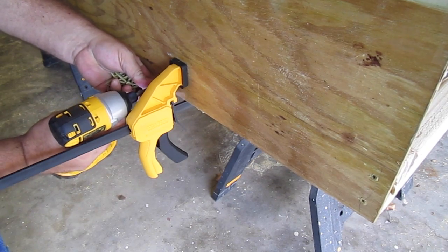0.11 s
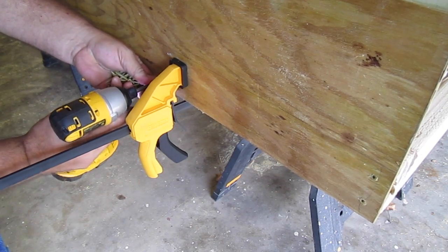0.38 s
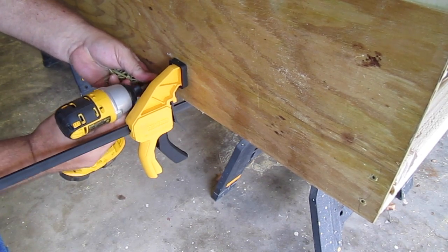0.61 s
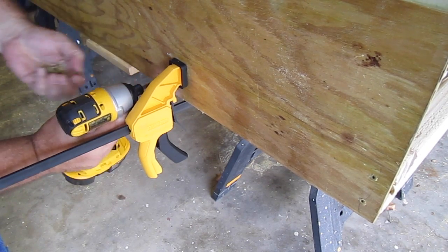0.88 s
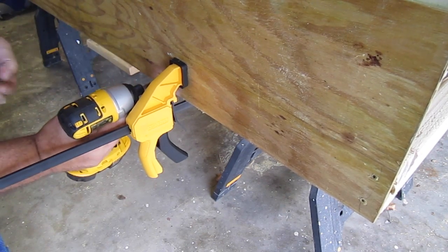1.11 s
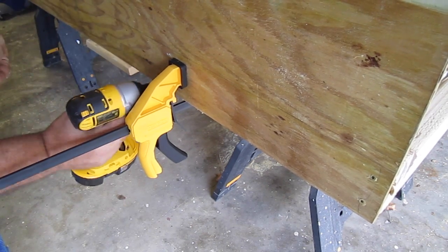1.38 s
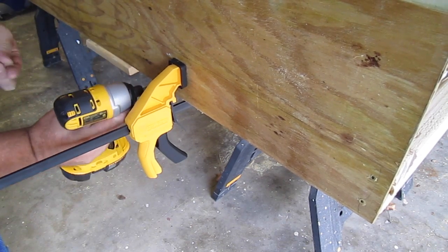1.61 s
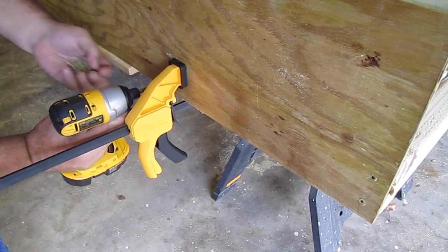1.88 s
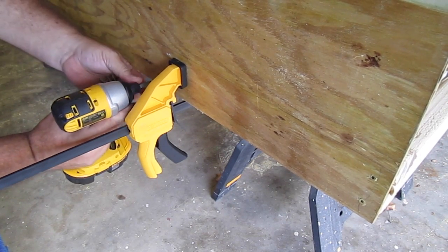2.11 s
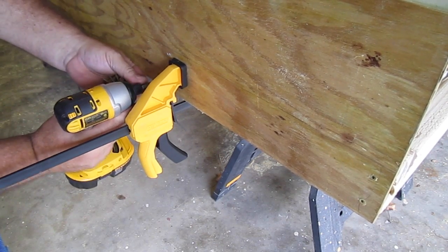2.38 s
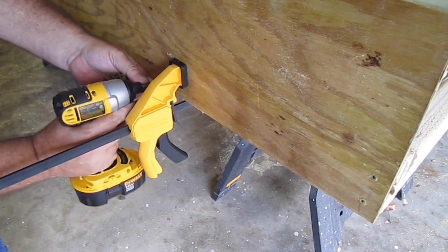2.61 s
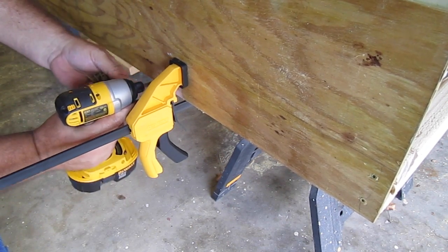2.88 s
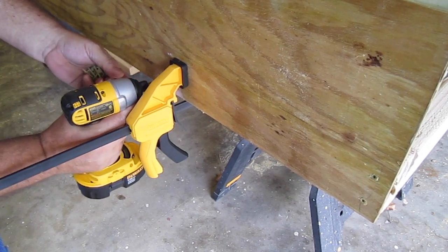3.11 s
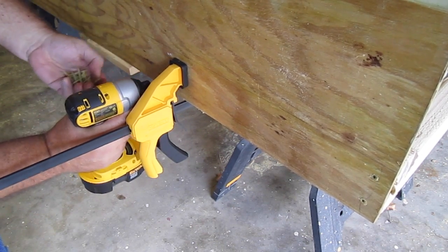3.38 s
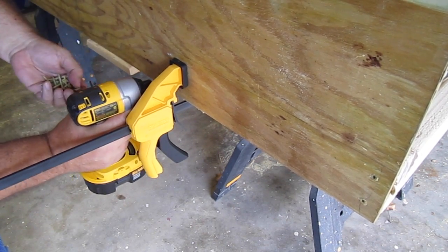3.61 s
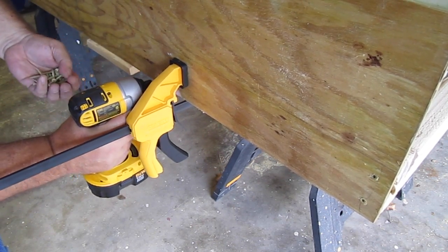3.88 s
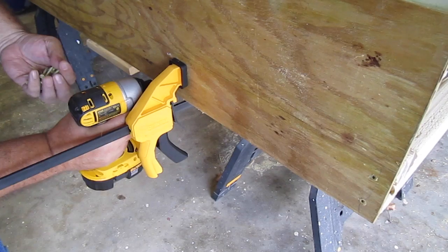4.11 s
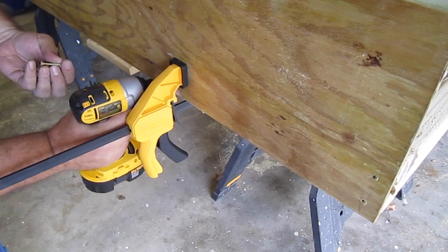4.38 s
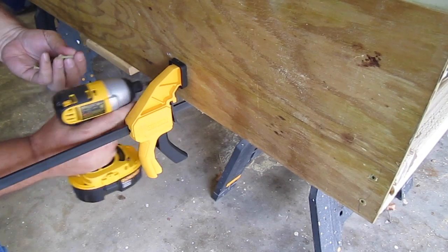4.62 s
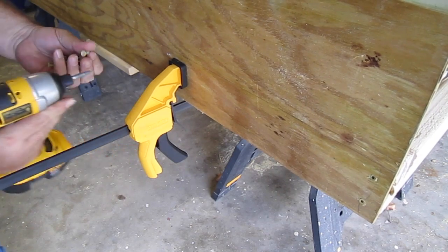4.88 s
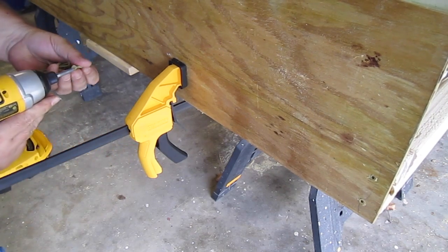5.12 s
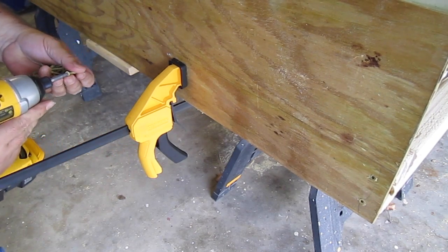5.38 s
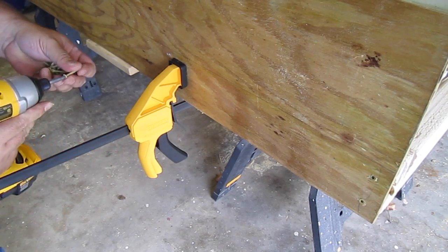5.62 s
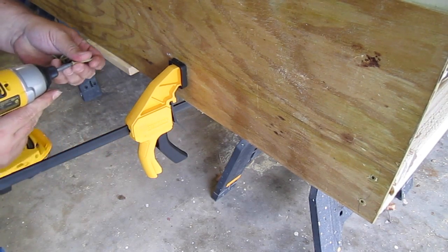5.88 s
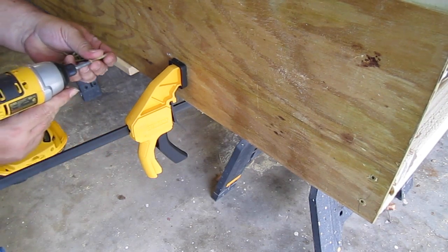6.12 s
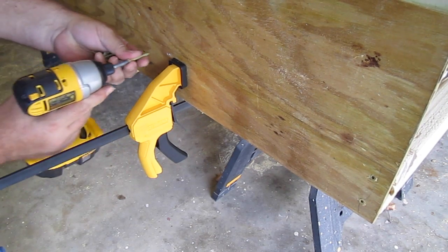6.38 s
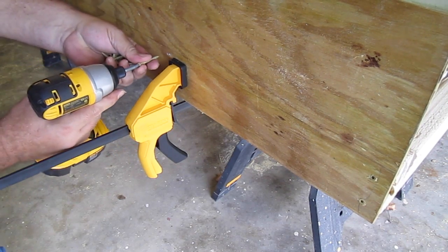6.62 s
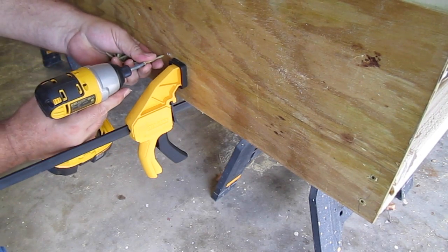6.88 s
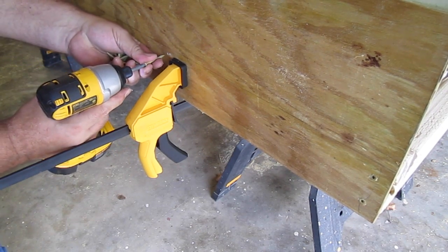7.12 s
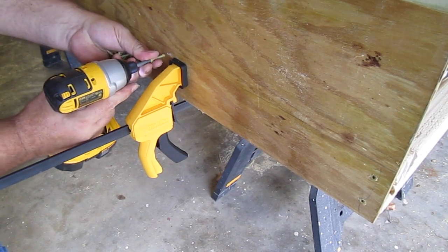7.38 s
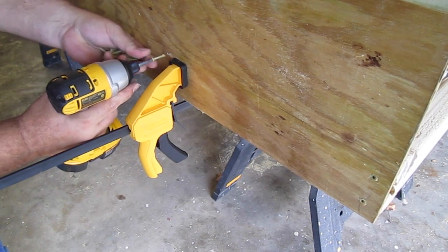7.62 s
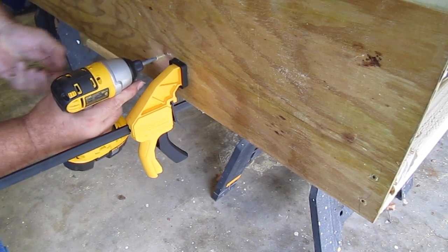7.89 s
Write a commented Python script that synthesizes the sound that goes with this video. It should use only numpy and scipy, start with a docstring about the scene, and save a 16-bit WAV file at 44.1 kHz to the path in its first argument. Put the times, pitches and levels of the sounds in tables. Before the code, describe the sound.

Close up, a cordless impact driver whines freely, stops, then gives a harsh chattering burst against plywood. Woody knocks and bright screw tinkles follow. A slow start with a thin squeal builds into three fast volleys of steel hammer blows. Quiet handling and stray screw clinks fill a pause before two last short bursts, the second hammering. The shed answers with short echoes over faint hum and air.

```python
"""A cordless impact driver works in short bursts in a shed, on plywood that answers with its resonances.
First the free motor spins up and down, its gear whine tracking speed; loose screws tinkle as decaying sines.
A short burst follows, the bit chattering under load, then knocks (noise through wood modes) and more screws.
A slow, squealing burst leads to three volleys of hammer blows: snaps of noise, steel cracks and wood.
A drawn gain curve pulls steady hum and air noise down after the volleys and lets them creep up again behind
stray screws, until two last bursts, the second one hammering."""
import sys
import numpy as np
from scipy import signal
from scipy.fft import rfft, irfft, next_fast_len
from scipy.io import wavfile
from scipy.ndimage import uniform_filter1d, map_coordinates

SR = 44100
rng = np.random.default_rng(int(sys.argv[2]) if len(sys.argv) > 2 else 0)


def decibels_to_gain(level_db):
    """Convert a level in decibels to a linear amplitude gain (20 dB per decade)."""
    exponent = np.asarray(level_db, float) / 20
    return 10 ** exponent


def transcribe(signal):
    """Save signal, clipped to [-1, 1], as a 16-bit WAV file at the path in sys.argv[1]."""
    frames = np.atleast_2d(signal).T
    limited = np.clip(frames, -1, 1)
    pcm = np.round(limited * 32767).astype(np.int16)
    wavfile.write(sys.argv[1], SR, pcm)


N = 353241
T = np.arange(N) / SR

# All event levels are nominal: each layer adds its own trim and flutter.
# free-running bursts, one table each: t/s, gear mesh f/Hz, whirr level/dB
FREE_BURSTS = [
    [(0, 1642, -24), (.1, 1865, -25), (.2, 1921, -23.5), (.28, 1926, -26), (.35, 1844, -26),
     (.42, 1626, -24), (.55, 1102, -26.5), (.64, 780, -27), (.71, 480.5, -38)],
    [(.88, 552, -40), (.914, 968.5, -21), (.945, 1352, -22), (.96, 1420, -23.5), (1.0, 1500, -31.5)],
    [(2.88, 379.4, -36.5), (2.93, 487, -27.5), (2.97, 630, -24), (3.0, 659.2, -25), (3.05, 659.6, -25.5),
     (3.105, 587.4, -27.5), (3.125, 610.6, -26), (3.15, 825.6, -23.5), (3.2, 997, -25.5), (3.25, 1001, -27),
     (3.295, 886.6, -27), (3.34, 650, -43.5)],
    [(7.2, 520, -33.5), (7.25, 1103, -22), (7.28, 1384, -24), (7.31, 1637, -23), (7.34, 1781, -22.5),
     (7.37, 1815, -23), (7.41, 1697, -23.5), (7.47, 1367, -26.5), (7.5, 1093, -28.5), (7.53, 800, -36)],
    [(7.74, 604.7, -41), (7.766, 919, -26), (7.8, 1270, -23), (7.83, 1494, -23.5), (7.86, 1522, -24),
     (7.9, 1560, -29)],
]
# gear mesh harmonics: multiple of mesh, level/dB before housing and flutter
MESH_HARMONICS = [(1, 0), (2, -1), (2.68, -8), (3, -2), (4, 0), (5, -3), (6, -6), (7, -4), (8, -5), (9, -5),
                  (10, -5), (12, -5), (14, -6)]
# shaft and brush tones: multiple of mesh, level/dB re whirr at full speed
ROTOR_TONES = [(0.159, -22.5), (1.11, -13.5), (2.218, -11)]
# housing resonances, before their response is bent: f/Hz, width/Hz, level/dB
HOUSING_MODES = [(980, 300, -3), (1850, 400, 0), (2780, 420, 3), (4400, 350, -3), (5700, 1000, 1),
                 (7200, 1300, 0), (10300, 1500, -8)]
# colour of the motor's rush: f/Hz, level/dB per Hz
WHIRR_SPECTRUM = [(88, -51.5), (150, -20), (514, -11.5), (1480, -3), (1690, -2), (1940, -5), (2760, -1),
                  (4670, -3), (5360, 2.5), (12900, -8.5), (16000, -31)]
# gain curve of the background: t/s, level/dB
AMBIENT_GAIN = [(0.0, -64), (0.69, -58.5), (1.45, -68.5), (2.81, -61.5), (3.52, -61.5), (3.68, -76),
                (4.75, -83), (5.02, -74), (7.12, -64), (8.01, -64.5)]
# colour of the air noise: f/Hz, level/dB per Hz
AIR_SPECTRUM = [(15, -42), (25, -18), (59, -5), (123, -5), (153, -9), (256, -11), (285, -8.5), (354, -11.5),
                (451, -12.5), (840, -8.5), (1610, -21), (6920, -28), (16000, -44)]
# resonances of the low hum: f/Hz, width/Hz, level/dB
HUM_MODES = [(62, 12, -10), (123, 6.8, -2)]
# floor and wall echoes: delay t/s, level/dB
WALL_ECHOES = [(.007, -8), (.0215, -14)]
# decay of the shed's tail: f/Hz, t60/s
SHED_DECAY = [(150, 1), (1000, 0.51), (3000, 0.43), (8000, 0.26), (15000, 0.14)]
# screws touching: t/s, ring peak level/dB, tick level/dB above the ring
SCREW_TOUCHES = [(0.7801, -46, -13.5), (0.812, -39, -6), (0.8394, -42.5, -2), (1.448, -62, 15),
                 (1.6182, -54, -6), (1.868, -44.5, -15), (1.8842, -56, 0), (1.914, -42, -11),
                 (1.94, -39, -15), (1.9544, -49, -15), (1.9873, -42, -30), (2.0123, -43, -26),
                 (4.851, -56, -15), (4.9754, -54, -27.5), (5.0449, -57.5, -16), (5.1924, -58.5, -10),
                 (5.259, -42, -15), (5.688, -52.5, -17), (5.801, -65.5, 12), (5.9729, -63, 18.5),
                 (6.0246, -62.5, 17), (6.4218, -55, -15.5)]
# ringing modes of a screw: f/Hz, level/dB, t60/s
SCREW_MODES = [(7540, -6, 0.11), (7700, -10, 0.066), (8100, -6.5, 0.012)]
# switch and handling clicks: t/s, peak level/dB, ring f/Hz
TRIGGER_CLICKS = [(0.863, -27, 5230), (2.845, -26, 5565), (2.8667, -19, 5000), (3.4813, -20.5, 5320),
                  (3.8528, -47, 1670), (4.3042, -42.5, 5680), (7.119, -49, 3003), (7.1498, -46, 1663),
                  (7.1696, -45.5, 2775), (7.184, -19, 4930), (7.726, -25, 5020)]
# bit or tool knocking screw and board: t/s, crack peak level/dB, knock and boom level/dB above the crack
TOOL_KNOCKS = [(0.9715, -9.5, -19.5, -22.5), (1.2714, -24, 6.5, -6), (1.3354, -14, -7.5, -31),
               (1.4577, -38, 18, -12), (1.6791, -30.5, 1.5, -13), (2.1184, -42.5, 12.5, -23),
               (2.2466, -34, 4, -13), (2.253, -24.5, -13, -18.5), (2.571, -11, -8, -20),
               (2.7465, -36, -17.5, -21), (3.3837, -24.5, 2.5, -10), (3.719, -24, -15, -28.5),
               (4.0743, -28, 9, -22.5), (4.011, -26, 6, -26), (4.3338, -21.5, -15, -37),
               (4.362, -17.5, -8.5, -16.5), (7.9858, -25, -23, -12)]
# hammer blows on the anvil: t/s, crack peak level/dB, knock level/dB above the crack
HAMMER_BLOWS = [(3.5284, -10, -13.5), (3.537, -7, -5), (3.5448, -10, -10), (3.575, -10.5, -12.5),
                (3.6055, -7.5, -14), (3.6364, -8.5, -6), (3.6673, -10.5, -10), (3.7005, -12, -12),
                (3.7095, -13, 0), (3.9042, -9.5, -2), (3.9321, -9.5, -19), (3.9619, -15.5, -17.5),
                (3.9886, -9.5, -18.5), (4.0182, -12, -23), (4.0547, -12, -6), (4.368, -10.5, -2.5),
                (4.3947, -11, -9.5), (4.4236, -12, -28.5), (4.4508, -12, -11), (4.4804, -13, -21),
                (4.511, -11.5, -8), (7.867, -20, -22), (7.884, -10, -28), (7.895, -10, -28),
                (7.905, -14, -28), (7.939, -14, -28), (7.9505, -11, -25), (7.961, -17.5, -25),
                (7.9725, -11, -23.5)]
# released hammer rattling to rest: first t/s, peak level/dB
HAMMER_RATTLES = [(4.0873, -30.5)]
# colour of the steel crack: f/Hz, level/dB per Hz
CRACK_SPECTRUM = [(880, -6.5), (1500, -4.5), (1960, -9), (2830, -8), (5330, -10), (7760, -9.5), (8490, -9),
                  (16000, -26)]
# plywood near the screw: f/Hz, width/Hz, level/dB
KNOCK_MODES = [(691, 100, -5.5), (905, 65, -2), (1190, 130, -0.5), (1560, 220, -0.5), (2200, 880, -11)]
# the whole panel: f/Hz, width/Hz, level/dB
BOOM_MODES = [(100, 14, -1), (180, 48, -5.5), (279, 23, 3), (314, 23, 2), (469, 50, -1.5)]
# bit turning under load, board shaking; the row at 1.32 s is the brief shake of a single blow:
# end of rise t/s, start of fall t/s, then whirr, knock and boom level/dB
LOADED_SHAKES = [(0.973, 1.23, -26.5, -28.5, -36), (1.324, 1.316, -44.5, -34, -47),
                 (3.54, 3.711, -45.5, -44.5, -45.5), (3.912, 4.12, -57, -44, -49.5),
                 (4.362, 4.538, -51, -50, -57.5), (7.87, 7.931, -25.5, -30.5, -32)]
# load winding up to the first hammer blow: peak t/s, then whirr, knock and boom level/dB
LOAD_WINDUPS = [(3.528, -24, -24, -44), (3.901, -34.5, -28.5, -44), (4.362, -32.5, -34.5, -49)]
# speed control squealing at part trigger: start t/s, stop t/s, first f/Hz, level/dB
SQUEALS = [(2.875, 3.112, 4962, -30.5), (3.133, 3.273, 4880, -36.5), (7.212, 7.226, 4620, -32)]


def unit(x):
    """Scaled to rms 1."""
    return x / np.sqrt(np.mean(x ** 2) + 1e-20)


def along(points, hz):
    """Value at hz of (Hz, value) points on a log axis."""
    f, v = np.transpose(points)
    return np.interp(np.log(hz + 1), np.log(f + 1), v)


def column(tables, index):
    """One column of all tables, joined by straight lines."""
    rows = np.concatenate(tables)
    return np.interp(T, rows[:, 0], rows[:, index])


def level(tables, index, fade):
    """Gain from a dB column, faded to silence outside each burst."""
    gain = np.zeros(N)
    for rows in map(np.array, tables):
        gate = np.clip(np.minimum(T - rows[0, 0], rows[-1, 0] - T) / fade + 1, 0, 1)
        gain = np.maximum(gain, gate * decibels_to_gain(np.interp(T, rows[:, 0], rows[:, index])))
    return gain


def wobble(rate):
    """A smooth random curve, rate knots a second."""
    return map_coordinates(rng.standard_normal(int(N * rate / SR) + 4), [T * rate])


def filtered(x, response):
    """x through a complex response of frequency."""
    m = next_fast_len(N + SR)
    return irfft(rfft(x, m) * response(np.fft.rfftfreq(m, 1 / SR)), m)[:N]


def noise(spectrum):
    """Coloured noise of rms 1."""
    return unit(filtered(rng.standard_normal(N), lambda hz: decibels_to_gain(along(spectrum, hz))))


def modes(table):
    """Causal response of a set of resonances, alternating in sign."""
    def response(f):
        return sum((-1) ** k * decibels_to_gain(db) * 1j * f * w / (c * c - f * f + 1j * f * w)
                   for k, (c, w, db) in enumerate(table))
    return response


def panel(table):
    """Wood resonances; the sheet radiates little below its lowest mode."""
    return lambda f: modes(table)(f) * (1j * f / (90 + 1j * f)) ** 3


def strikes(times, sizes, t60, attack):
    """Envelope of hits that rise fast and die away; t60 and attack in s."""
    kicks = np.bincount(np.round(np.asarray(times) * SR).astype(int), sizes, N)[:N]
    t = np.arange(SR // 4) / SR
    return signal.fftconvolve(kicks, decibels_to_gain(-60 * t / t60) * (1 - np.exp(-t / attack)))[:N]


def stretch(start, stop, rise, fall, sag=0):
    """dB shape that climbs to 0 at start, sags until stop and then falls, all in dB a second."""
    climb = -rise * np.maximum(start - T, 0)
    droop = -sag * np.clip(T - start, 0, stop - start)
    return climb + droop - fall * np.maximum(T - stop, 0)


def motor():
    """Fan and gear rush, throbbing with the planet carrier, under fluttering mesh harmonics of the housing."""
    mesh_hz = uniform_filter1d(column(FREE_BURSTS, index=1), size=900)
    speed = mesh_hz / 1900  # 1 = full speed
    turns = 2 * np.pi * np.cumsum(mesh_hz) / SR
    carrier = turns / 18.2
    throb = decibels_to_gain(2.8 * np.sin(carrier) + 1.8 * wobble(150) + 1.3 * wobble(700))
    whirr = level(FREE_BURSTS, index=2, fade=0.009)

    # uneven planets put sidebands at the carrier rate; the faster, the rougher
    unevenness = speed ** 1.5 * (.35 * np.sin(carrier) + .19 * wobble(140)) + .03 * wobble(60)
    housing = modes(HOUSING_MODES)
    whine = np.zeros(N)
    for k, db in MESH_HARMONICS:
        flutter = decibels_to_gain(db + 3.5 * wobble(45))
        colour = np.abs(housing(k * mesh_hz)) ** 1.5 + .18
        audible = k * mesh_hz < 14000
        whine += flutter * colour * audible * np.sin(k * (turns + unevenness) + .22 * wobble(90))
    rotor = sum(decibels_to_gain(db + 0.81 * wobble(40)) * np.sin(k * turns) for k, db in ROTOR_TONES) * speed ** 4.3

    # the rush brightens above 10 kHz as the motor speeds up
    rush = noise(WHIRR_SPECTRUM)
    treble = filtered(rush, lambda f: 1 / (1 + (10000 / (f + 1)) ** 4))
    rush = rush + treble * (speed ** 1.1 - 1)
    effort = np.minimum(whirr / decibels_to_gain(-25), 1)  # the whine thins out below a -25 dB whirr
    return whirr * (decibels_to_gain(-2.5) * unit(throb * rush) + rotor + decibels_to_gain(-7.5) * whine * np.sqrt(effort))


def ambience():
    """Steady distant air noise, gently wavering, and a low hum, both under one gain curve."""
    hum = unit(filtered(rng.standard_normal(N), modes(HUM_MODES)))
    air = noise(AIR_SPECTRUM) * decibels_to_gain(0.9 * wobble(6.6))
    return decibels_to_gain(column([AMBIENT_GAIN], index=1)) * (decibels_to_gain(8.5) * air + decibels_to_gain(-0.5) * hum)


def shed(x):
    """Two clear echoes, then a tail, never twice alike, in which each frequency dies at its own speed."""
    size = SR // 8  # each eighth of a second gets its own random tail
    hz, t, z = signal.stft(rng.standard_normal((N // size + 1, SR * 3 // 4)), SR, nperseg=256)
    tails = signal.istft(z * decibels_to_gain(-60 * t / along(SHED_DECAY, hz)[:, None]), SR, nperseg=256)[1]
    tails = tails / np.linalg.norm(tails, axis=1, keepdims=True)
    pieces = np.pad(x, (500, size))[:len(tails) * size].reshape(-1, size)  # 500 samples of pre-delay
    answers = signal.fftconvolve(pieces, tails, axes=1)
    places = np.arange(len(tails))[:, None] * size + np.arange(answers.shape[1])
    late = np.bincount(places.ravel(), answers.ravel())[:N]
    early = filtered(x, lambda f: sum(decibels_to_gain(db) * np.exp(-2j * np.pi * f * s) for s, db in WALL_ECHOES))
    return early + decibels_to_gain(-6.0) * late


def screws():
    """Loose screws touch: a noisy tick, then steel modes ring as decaying sines."""
    s, db, tick_db = np.transpose(SCREW_TOUCHES)
    ring = np.zeros(N)
    for hz, mode_db, t60 in SCREW_MODES:
        envelope = strikes(s, decibels_to_gain(db + mode_db + 2 * rng.standard_normal(len(s))), t60, attack=0.00034)
        ring += envelope * np.sin(2 * np.pi * hz * T + .8 * wobble(80))
    tick = noise([(500, -60), (1500, -1), (5000, -7), (11000, -1.5), (16000, -12.5)])
    return ring + strikes(s, decibels_to_gain(db + tick_db + 0.5), t60=.012, attack=.0003) * tick


def trigger():
    """Plastic parts snap with a short, scratchy ring of narrow-band noise."""
    out = np.zeros(N)
    for s, db, hz in TRIGGER_CLICKS:
        resonance = modes([(hz, 900, 0)])
        ring = unit(filtered(rng.standard_normal(N), lambda f: resonance(f) ** 3))
        out += strikes([s], [decibels_to_gain(db - 5.5)], t60=0.028, attack=0.0013) * ring
    return out


def hammer_rattle():
    """The released hammer rattles to rest, ever faster and softer: rows like those of HAMMER_BLOWS."""
    gap, shrink, loss_db = 0.0091, 0.96, 1.6  # first gap in s, gap ratio, dB lost per hit
    return [(s + gap * (1 - shrink ** k) / (1 - shrink), db - loss_db * k, -8)
            for s, db in HAMMER_RATTLES for k in range(7)]


def crack_burst(s, db):
    """Steel on steel: a sharp snap over a short crack of coloured noise."""
    crack = strikes(s, decibels_to_gain(db - 9.5), t60=0.027, attack=0.00046)
    snap = strikes(s, decibels_to_gain(db - 5), t60=0.006, attack=0.0004)
    return (crack + snap) * noise([(300, -53)] + CRACK_SPECTRUM)


def blows():
    """Each blow is a sharp snap, a short steel crack and a push into the board."""
    hammer = [(*row, -28) for row in HAMMER_BLOWS + hammer_rattle()]  # boom 28 dB under the crack
    s, db, knock_db, boom_db = np.transpose(hammer + TOOL_KNOCKS)
    hard = len(hammer)
    bright = crack_burst(s[:hard], db[:hard])
    # knocks of the tool lack the treble of steel on steel
    dull = filtered(crack_burst(s[hard:], db[hard:]), lambda f: 1 / (1 + 1j * f / 7000) ** 2)
    crack = filtered(bright + dull, lambda f: (1j * f / (250 + 1j * f)) ** 2)

    contact = 0.9 + 2.1 * rng.standard_normal(N)  # a push roughened with noise
    knock = strikes(s, decibels_to_gain(db + knock_db + 18), t60=0.0016, attack=.0001) * contact
    boom = strikes(s, decibels_to_gain(db + boom_db + 21.5), t60=0.0026, attack=0.00018) * contact
    return crack + filtered(knock, panel(KNOCK_MODES)) + filtered(boom, panel(BOOM_MODES))


def load(index, fall):
    """Gain of one layer (1 whirr, 2 knock, 3 boom) of the loaded tool: turns, a single shake and wind-ups."""
    shaking = sum(decibels_to_gain(row[index + 1] + stretch(row[0], row[1], rise=3000.5, fall=fall, sag=16))
                  for row in LOADED_SHAKES)
    winding = sum(decibels_to_gain(row[index] + stretch(row[0], row[0], rise=553.5, fall=2998))
                  for row in LOAD_WINDUPS)
    return shaking + winding


def chatter():
    """Under load the bit rattles in the screw head some 200 times a second and shakes the board."""
    period = 215  # samples
    draws = rng.standard_normal((N // period, 2))  # timing and strength of each hit
    times = np.clip((np.arange(len(draws)) + 0.18 * draws[:, 0]) * period / SR, 0, T[-1])
    rattle = 0.75 + strikes(times, decibels_to_gain(2.2 * draws[:, 1]), t60=0.015, attack=0.00034)
    sizzle = noise([(7000, -29), (10500, -0.5), (13000, -4.5), (16000, -25)])
    metal = unit(rattle * noise(WHIRR_SPECTRUM) + 0.12 * rattle ** 3 * sizzle)
    knock = unit(filtered(rattle * rng.standard_normal(N), panel(KNOCK_MODES)))
    boom = unit(filtered(rattle * rng.standard_normal(N), panel(BOOM_MODES)))
    # wood dies faster than metal, in dB a second
    return load(1, fall=141) * metal + load(2, fall=208) * knock + load(3, fall=208) * boom


def squeal():
    """The speed control whistles: a wavering sine that climbs 110 Hz while it lasts."""
    out = np.zeros(N)
    for start, stop, hz, db in SQUEALS:
        pitch = hz + 110 * np.clip((T - start) / (stop - start), 0, 1) + 60 * wobble(40)
        gain = decibels_to_gain(db + stretch(start, stop, rise=4000, fall=900) + 2.9 * wobble(60))
        out += np.sqrt(2) * gain * np.sin(2 * np.pi * np.cumsum(pitch) / SR + 0.8 * wobble(200))
    return out


def scene():
    """Tool and screws close by; the tool also feeds the shed's echoes, over the background."""
    running = motor() + squeal() + chatter()
    knocks = blows() + trigger()
    room = shed(decibels_to_gain(-7.0) * running + knocks)
    return (running + knocks + screws() + room + ambience())[None]


def roll_off(x):
    """The treble ends steeply here."""
    return signal.sosfilt(signal.butter(12, 17020, fs=SR, output="sos"), x)


def record(dry):
    """The finished mix, delivered."""
    return roll_off(dry)


dry = scene()
out = record(dry)
transcribe(out)
```